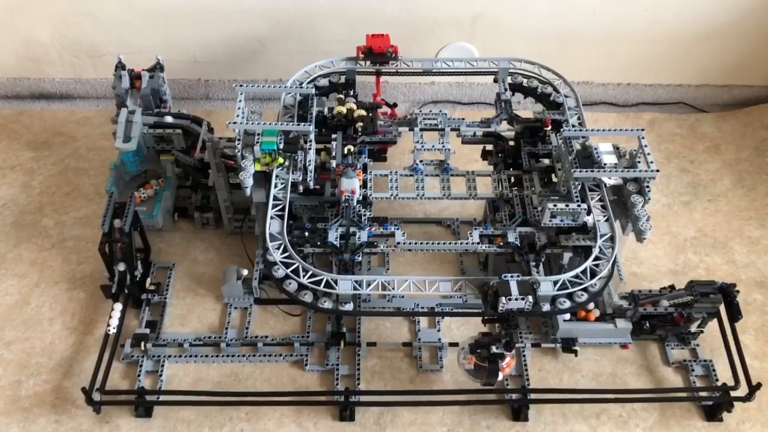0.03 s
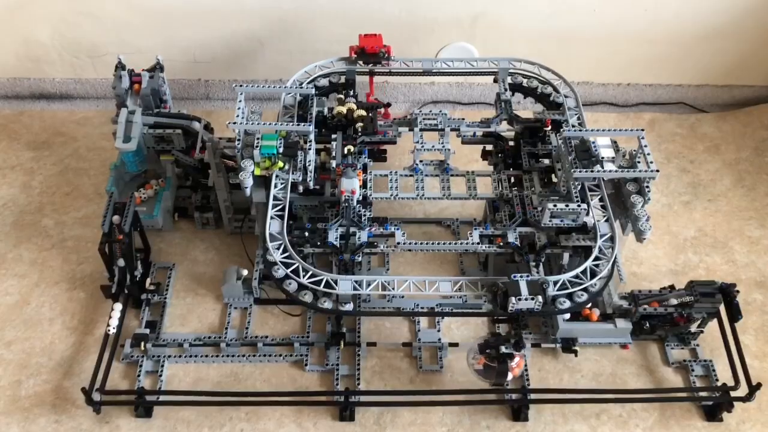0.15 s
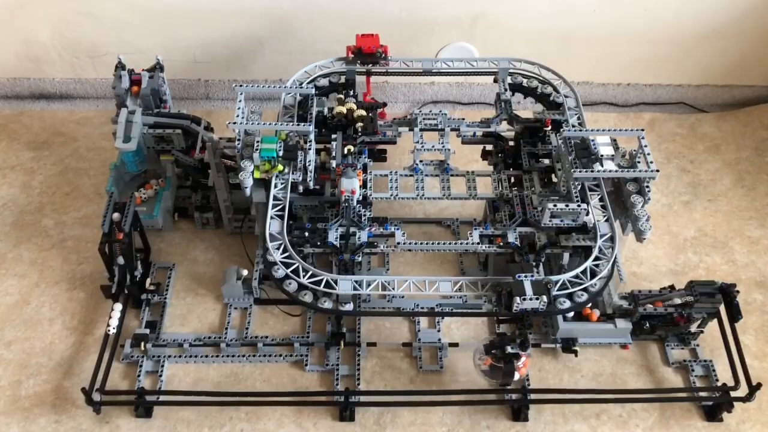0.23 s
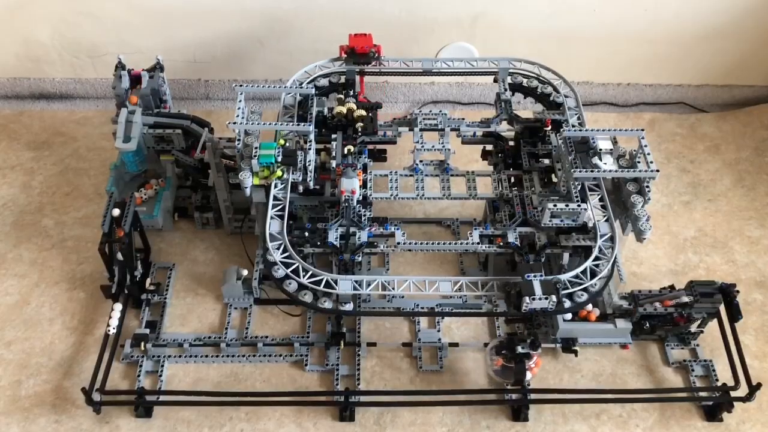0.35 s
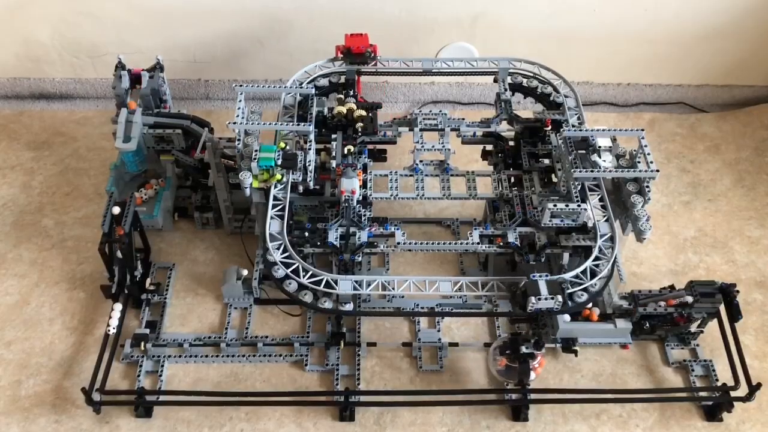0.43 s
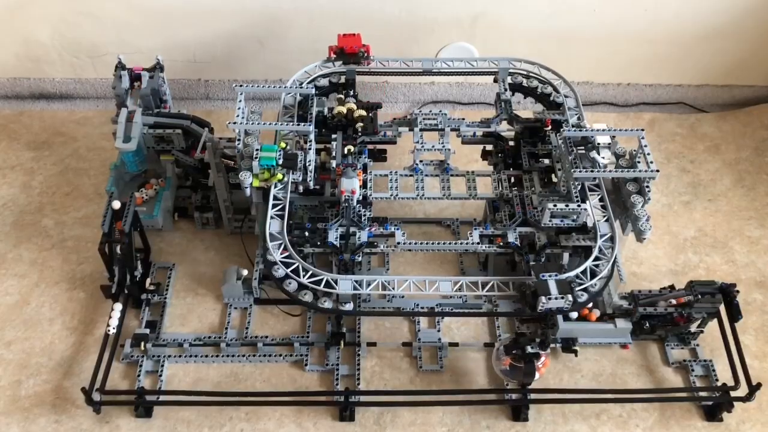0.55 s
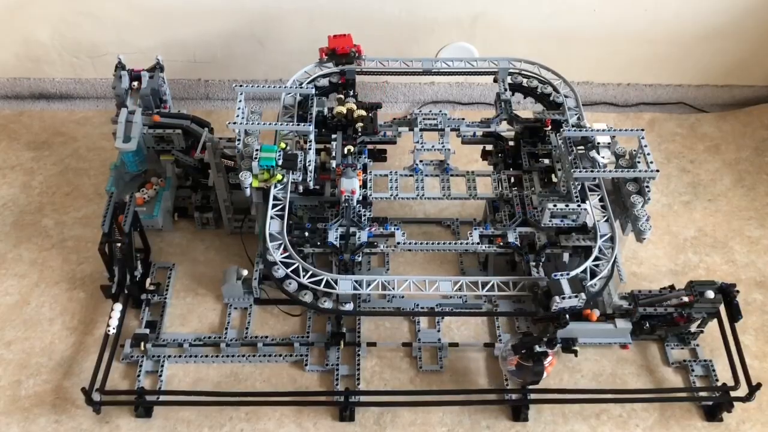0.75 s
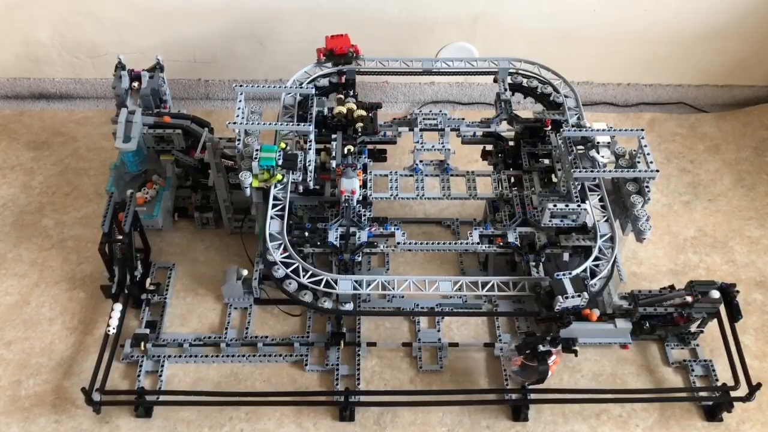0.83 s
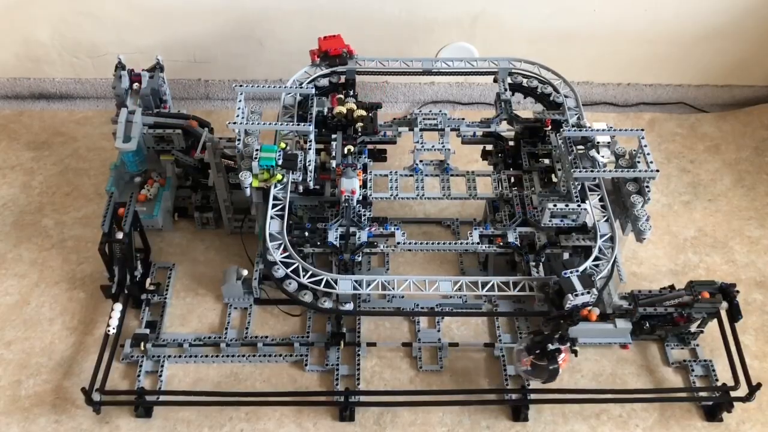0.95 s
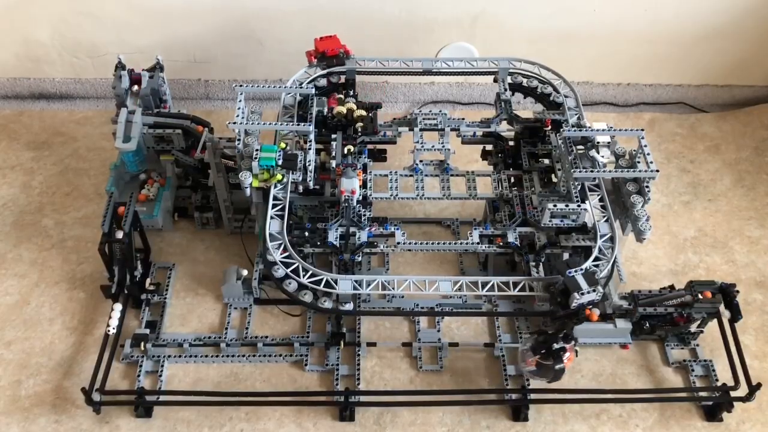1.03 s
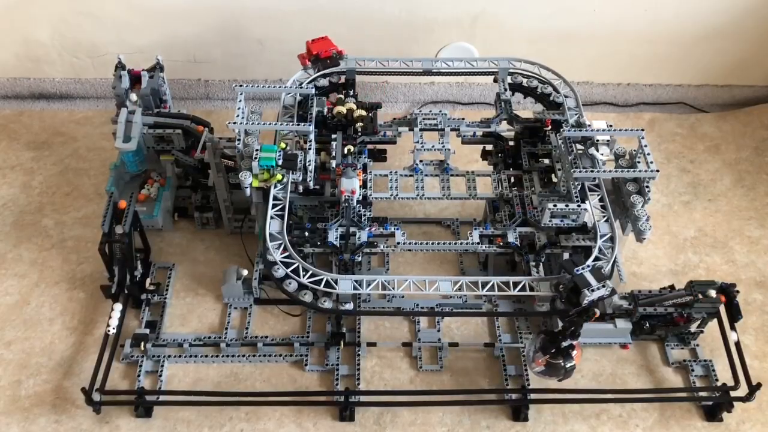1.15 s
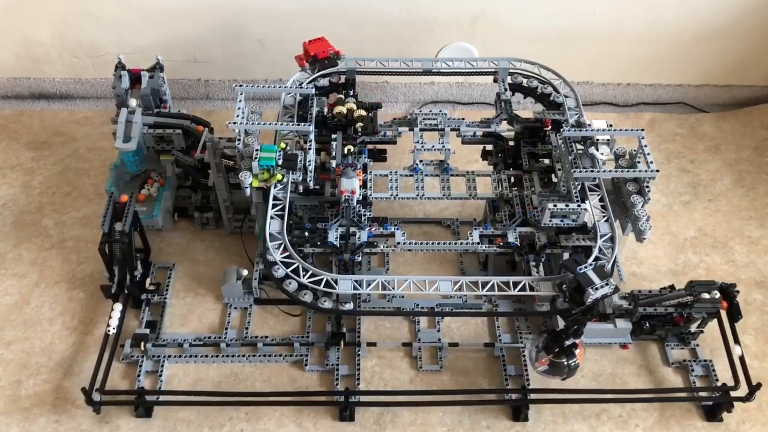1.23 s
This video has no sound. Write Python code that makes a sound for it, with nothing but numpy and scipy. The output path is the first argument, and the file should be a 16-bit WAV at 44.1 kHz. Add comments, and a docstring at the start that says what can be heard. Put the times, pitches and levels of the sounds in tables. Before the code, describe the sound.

A motorised machine of plastic building bricks rattles and whirs in a small room. Small parts knock irregularly against its frame, a lever clacks sharply, then a catch snaps, each hit with a short echo.

```python
"""On the floor of a small room, a motorised machine of plastic building bricks is running.
Its gears rattle and whine as teeth click and axles rub, and one motor hums louder under load.
Small balls and links knock against the frame, and rolling parts make it drone.
A lever clacks over and bounces, then a catch snaps. The walls add a short echo to these hits."""
import sys
import numpy as np
from scipy import signal
from scipy.fft import rfft, irfft
from scipy.io import wavfile
from scipy.ndimage import uniform_filter1d

SR = 44100
rng = np.random.default_rng(int(sys.argv[2]) if len(sys.argv) > 2 else 0)


def master(y):
    """Save y as 16-bit WAV."""
    cut = np.clip(np.atleast_2d(y).T, -1, 1)
    pcm = np.round(cut * 32767)  # scale
    wavfile.write(sys.argv[1], SR, pcm.astype(np.int16))


N = 57330


def gain(db):
    """Turn decibels into a number to multiply by."""
    return 10 ** (np.asarray(db) / 20)

def clock():
    """The time of each sample, in seconds."""
    return np.arange(N) / SR

def freqs():
    """The frequency of each point in a spectrum, in Hz."""
    return np.maximum(np.arange(N // 2 + 1) * SR / N, 1)

def normalise(x):
    """Scale a sound to an average power of 1."""
    return x / np.sqrt(np.mean(x ** 2))

def loudness(points):
    """A gain over time, joining (t/s, level/dB) points with straight lines."""
    return gain(np.interp(clock(), *np.array(points).T))

def tone_curve(points):
    """A gain for each frequency, joining (f/Hz, level/dB) points."""
    hz, db = np.array(points).T
    return gain(np.interp(np.log(freqs()), np.log(hz), db))

def resonance(hz, width):
    """Noise gathered around one pitch: the narrower, the more like a note."""
    f = freqs()
    off_pitch = (f / hz - hz / f) * hz / width / 2
    return normalise(irfft(rfft(rng.standard_normal(N)) / (1 + off_pitch ** 2), N))

def fade(start, decay, rise=0.00033):
    """A quick rise, then a fall. Every decay here is the seconds taken to drop by 60 dB."""
    age = np.maximum(clock() - start, 0)
    return (1 - np.exp(-age / rise)) * np.exp(-np.log(1000) * age / decay)

def crack(force, tone, smooth_hz=404):
    """A hit shakes many notes of the plastic at once, making a burst of noise."""
    burst = rfft(force * rng.standard_normal(N))
    burst /= np.sqrt(uniform_filter1d(np.abs(burst) ** 2, int(smooth_hz * N / SR)))  # even it out
    sound = irfft(burst * tone_curve(tone), N) * np.sqrt(np.sum(force ** 2))
    bass_cut = signal.butter(2, 283, "high", fs=SR, output="sos")  # small parts give little bass
    return signal.sosfilt(bass_cut, sound)

def ring(start, hz, db, decay):
    """One fading note of a part that has been hit."""
    return gain(db) * fade(start, decay) * np.sin(2 * np.pi * hz * (clock() - start))

def strike(hits, tone, notes, decay):
    """A part bounces on its stop: every hit cracks, and the hardest sets it ringing."""
    hardest_time = max(hits, key=lambda hit: hit[1])[0]
    cracks = sum(crack(gain(db) * fade(start, decay), tone) for start, db in hits)
    rings = sum(ring(hardest_time, *note) for note in notes)
    return np.array([cracks, rings])


# The rattle's tone, from bass to treble: f/Hz, relative level/dB
RATTLE_TONE = [(20, -35), (42, -8.5), (60, -21), (85, -9), (115, -13.5), (210, -8), (300, -11.5),
               (480, -4.5), (780, -7), (980, -5), (1250, -6), (1850, -6.5), (2700, -6.5), (3900, -9.5),
               (7200, -6.5), (9500, -11.5), (12500, -15), (15800, -15.5)]
# How loud the rattle gets as the gears work: t/s, level/dB
RATTLE_LEVELS = [(.06, -41), (.11, -38.5), (.18, -43), (.39, -43), (.6, -39), (.75, -41.5), (.95, -41.5),
                 (1.08, -40), (1.18, -42.5), (1.3, -40.5)]
# The pitches the gears whine at: f/Hz, width/Hz, level/dB
WHINE_PITCHES = [(627, 10, -69.5), (712, 9.2, -63), (761, 12, -60.5), (1080, 54, -58.5), (1195, 28, -60.5),
                 (1354, 15, -58.5), (2210, 98, -56), (3635, 50, -62.5), (5550, 83, -58), (8500, 54, -84)]

def gears(teeth_per_s=1500, scatter_db=2, click_decay=0.011):
    """Many tiny tooth clicks blend with rubbing axles and a steady whine."""
    tooth_hits = rng.random(N) < teeth_per_s / SR
    clicks = tooth_hits * gain(scatter_db * np.minimum(rng.exponential(size=N), 4))
    kept_per_sample = np.exp(-2 * np.log(1000) / (click_decay * SR))
    energy = signal.lfilter([1], [1, -kept_per_sample], clicks ** 2)
    teeth = normalise(np.sqrt(energy) * rng.standard_normal(N))
    rubbing = rng.standard_normal(N)
    rattle = normalise(irfft(rfft(teeth + rubbing) * tone_curve(RATTLE_TONE), N))
    whine = sum(gain(db) * resonance(hz, width) for hz, width, db in WHINE_PITCHES)
    return rattle * loudness(RATTLE_LEVELS) + whine


# How loud the motor hums: t/s, level/dB
HUM_LEVELS = [(.05, -68), (.13, -58), (.22, -65), (.3, -57), (.38, -66), (.54, -63), (.6, -54), (.68, -63),
              (.77, -56.5), (.95, -52), (1.04, -53.5), (1.09, -65), (1.3, -66)]

def motor(hum_hz=345, wobble=0.0067):
    """The motor's hum wavers a little in pitch and swells under load."""
    hz = hum_hz * (1 + wobble * resonance(hz=6.5, width=9.4))
    return np.sqrt(2) * loudness(HUM_LEVELS) * np.sin(2 * np.pi * np.cumsum(hz) / SR)


# Where a knock's bass, middle, upper middle and treble lie: f/Hz
BANDS = [550, 1700, 5000, 11000]
# One knock a row: t/s, level/dB in each of the four bands, then its ring's f/Hz, level/dB, decay/s
FRAME_KNOCKS = [(0.2032, -32, -23, -37, -39, 1700, -33.5, 0.036),
                (.216, -23, -18, -31, -39, 2226, -28, 0.022),
                (0.2296, -21.5, -24, -30, -30, 1260, -38, 0.024),
                (0.2724, -42, -32, -42, -35, 10120, -30.5, 0.0091),
                (0.348, -40, -38, -30, -33, 6900, -36, .015), (.5285, -30, -39, -39, -42, 687, -30, 0.041),
                (0.5421, -27, -25, -22, -31, 4650, -21.5, 0.014),
                (0.5451, -20, -14, -17, -25.5, 1585, -18.5, 0.024),
                (0.5739, -17, -19, -29, -33, 1660, -33, 0.042),
                (0.587, -25, -28, -19.5, -32, 3580, -33, 0.069),
                (0.5872, -20.5, -37, -25, -42, 1066, -30, 0.034),
                (.638, -39, -45, -23, -29, 6400, -19.5, 0.018),
                (.6635, -23, -36, -46, -45, 603, -32, 0.032),
                (0.687, -25, -33, -31, -31, 8800, -33.5, 0.025),
                (0.724, -32, -41, -30, -30.5, 10270, -32.5, .02),
                (0.746, -25, -43, -28, -34, 6370, -38, .015),
                (0.8789, -33, -20, -18.5, -32.5, 6440, -29.5, .025),
                (0.8942, -39, -31, -43, -42, 1270, -29.5, .02),
                (.910, -29.5, -22, -34, -42, 1260, -35, 0.022),
                (0.95, -40, -19.5, -29, -42, 4440, -36, 0.024),
                (0.9991, -32, -19.5, -31, -33, 876, -30, .025),
                (1.0014, -36, -34, -22, -33, 5800, -22.5, 0.021),
                (1.063, -37, -37, -34, -37, 5750, -33.5, .025), (1.21, -27, -30, -38, -32, 7900, -39, .015),
                (1.276, -31, -43, -39, -36, 8050, -40, .015)]

def knocks():
    """Balls and links hit the frame, each with its own crack and one ringing note."""
    cracks, rings = np.zeros((2, N))
    for start, *band_db, hz, ring_db, decay in FRAME_KNOCKS:
        tone = [*zip(BANDS, band_db), (15000, band_db[-1] - 5)]  # softer above the treble
        cracks += crack(fade(start, decay=0.023), tone)
        rings += ring(start, hz, ring_db, decay)
    return np.array([cracks, rings])


# The frame's drones: peak t/s, rise/s, fall/s, f/Hz, width/Hz, peak level/dB
FRAME_DRONES = [(0.23, 0.016, 0.054, 1230, 210, -38), (0.28, .04, .02, 194, 21, -53),
                (.29, 0.022, 0.022, 82, 25, -58), (0.45, .015, 0.025, 257, 80, -47.5),
                (0.43, .012, 0.038, 680, 200, -43), (0.62, 0.09, 0.077, 616, 160, -43),
                (.655, 0.026, 0.02, 3620, 30, -43.5), (0.67, 0.016, 0.022, 180, 42, -48),
                (1.005, 0.09, 0.07, 1050, 550, -44), (1.015, .015, 0.036, 83, 23, -56)]

def rolling_parts():
    """Parts roll over the frame or shake it, so it drones up and dies away."""
    t = clock()
    drones = np.zeros(N)
    for peak, rise, fall, hz, width, db in FRAME_DRONES:
        swell = np.exp(np.minimum((t - peak) / rise, (peak - t) / fall))
        drones += gain(db) * swell * resonance(hz, width)
    return drones


# The lever's hits and bounces: t/s, relative level/dB
LEVER_HITS = [(.4125, -0.5), (.4135, -0.5), (.4158, -6.5), (.4267, -6), (.429, -26), (.4368, -20),
              (.444, -24)]
# The tone of its crack: f/Hz, relative level/dB
LEVER_TONE = [(230, -8.5), (450, -20), (720, -10.5), (1000, -9), (1400, -11), (2200, -6.5), (3100, -14),
              (3700, -8), (4400, -12.5), (5300, -8.5), (6200, -11), (7500, -5.5), (9300, -9), (11600, -15),
              (12800, -14), (15800, -18)]
# The notes it rings with: f/Hz, level/dB, decay/s
LEVER_NOTES = [(716, -42, 0.31), (823, -44, 0.24), (1218, -31, 0.088), (2175, -20.5, 0.021),
               (2785, -24, 0.033), (3570, -22.5, .025), (5210, -28, 0.091), (6500, -37, 0.087),
               (7100, -33, 0.044), (7320, -18.5, 0.022), (8026, -21, 0.035), (8100, -42, 0.057),
               (9200, -33, 0.051)]

def lever():
    """The lever clacks against its stop, bounces and rings."""
    return strike(LEVER_HITS, LEVER_TONE, LEVER_NOTES, decay=0.015)


# The catch's hits: t/s, relative level/dB
CATCH_HITS = [(.7819, 0), (.7835, -3.5), (.7856, -1)]
# The tone of its crack: f/Hz, relative level/dB
CATCH_TONE = [(250, -20), (600, -20.5), (1200, -13.5), (1600, -22.5), (2500, -11), (3300, -11.5),
              (4300, -12.5), (4900, -17), (5800, -23), (6700, -17), (7400, -24), (9300, -18.5),
              (10200, -32), (15800, -32)]
# The notes it rings with: f/Hz, level/dB, decay/s
CATCH_NOTES = [(2013, -21.5, 0.032), (2516, -15.5, 0.021), (2850, -37, 0.015), (3130, -25, 0.017),
               (4280, -27.5, .01), (6761, -32.5, 0.027)]

def catch():
    """The catch hits three times, so fast that it sounds like one snap."""
    return strike(CATCH_HITS, CATCH_TONE, CATCH_NOTES, decay=0.0095)


# The echo from the walls, band by band: f/Hz, level/dB, decay/s
ECHO_BANDS = [(198, -6.5, 0.84), (1000, -0.5, 0.31), (3020, -1.5, 0.35), (7060, -5, 0.34),
              (13900, -4, 0.13)]

def room_echo(sound):
    """Reflections from the walls blur into a tail whose treble dies first."""
    noise = rfft(rng.standard_normal(N))
    log_centres = np.log([band[0] for band in ECHO_BANDS])
    tail = np.zeros(N)
    for this_band, (_, db, decay) in zip(np.eye(len(ECHO_BANDS)), ECHO_BANDS):
        band_noise = irfft(noise * np.interp(np.log(freqs()), log_centres, this_band), N)
        shape = fade(start=0.008, decay=decay, rise=0.005)
        tail += gain(db) * band_noise * shape / np.sqrt(np.sum(shape ** 2))
    return signal.fftconvolve(sound, tail)[:N]


def scene():
    """Add up the running machine, its hits and their echo."""
    cracks, rings = lever() + catch() + knocks()
    running = gears() + motor() + rolling_parts()
    echo = room_echo(cracks + gain(-4.5) * rings)  # less of the ringing reaches the walls
    return (running + cracks + rings + echo)[None]

def record(dry, full_at_s=0.053, fade_s=0.032, top_hz=15850):
    """Fade the sound in quickly and cut the very highest treble."""
    fade_in = np.clip(1 + (clock() - full_at_s) / fade_s, 0, 1) ** 2
    treble_cut = signal.ellip(10, .2, 80, top_hz, fs=SR, output="sos")
    return signal.sosfilt(treble_cut, dry * fade_in)


dry = scene()
out = record(dry)
master(out)
```